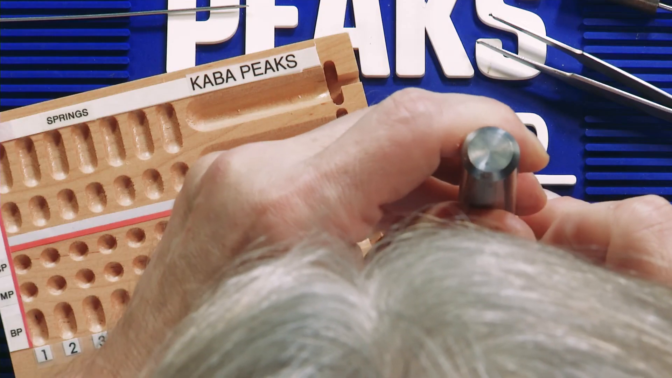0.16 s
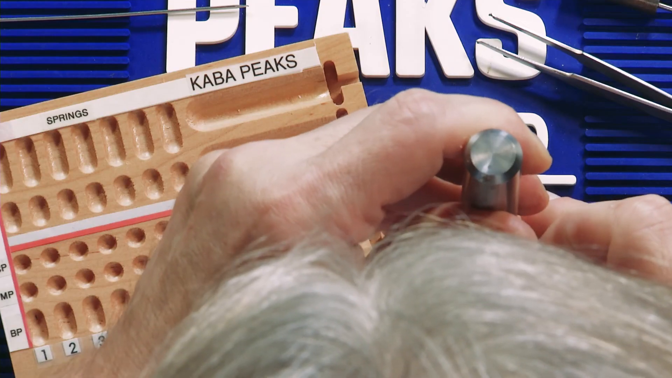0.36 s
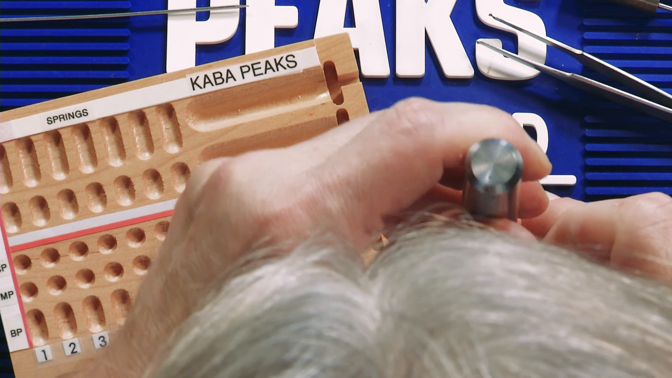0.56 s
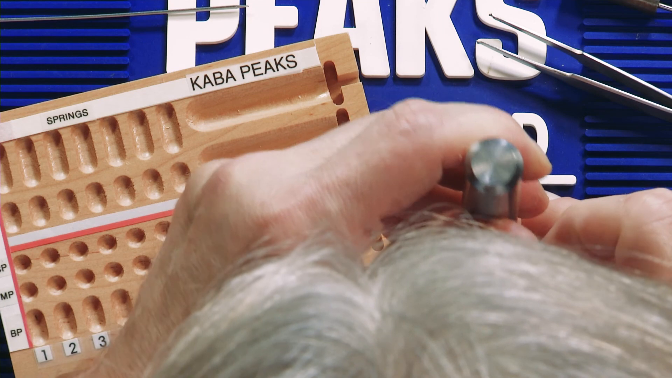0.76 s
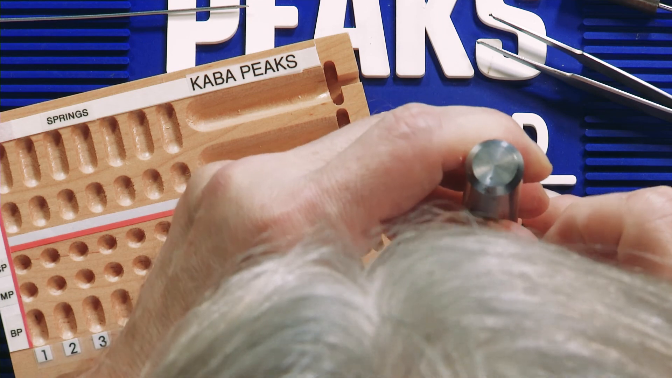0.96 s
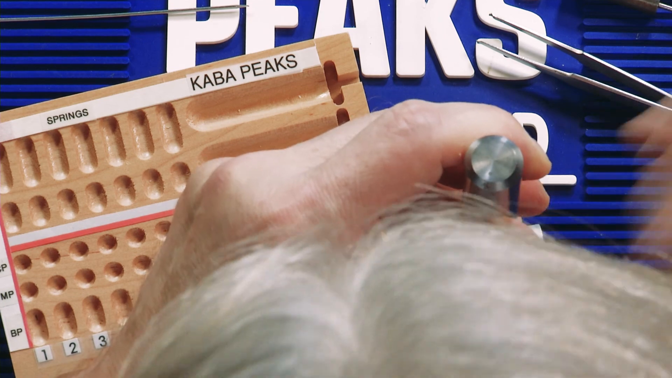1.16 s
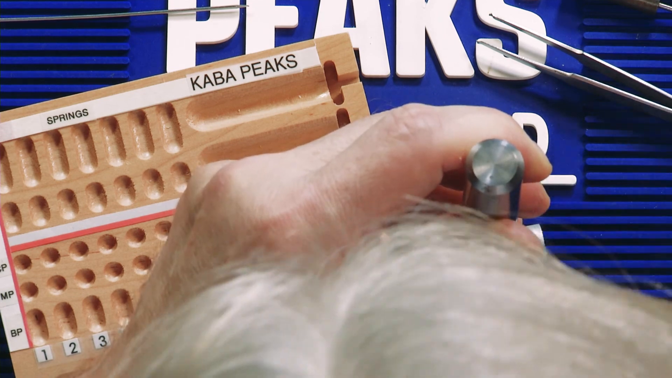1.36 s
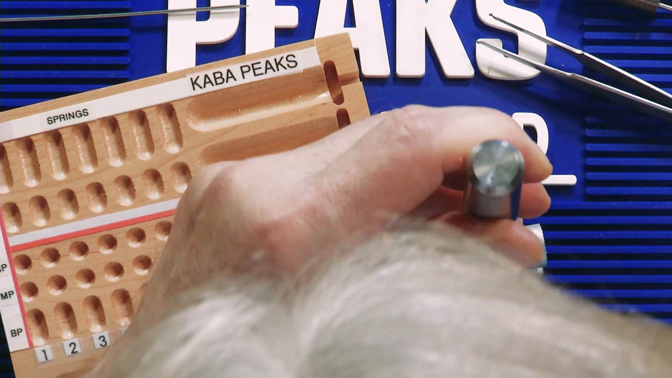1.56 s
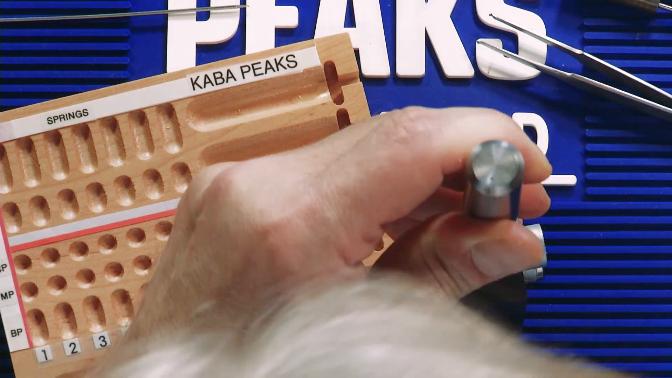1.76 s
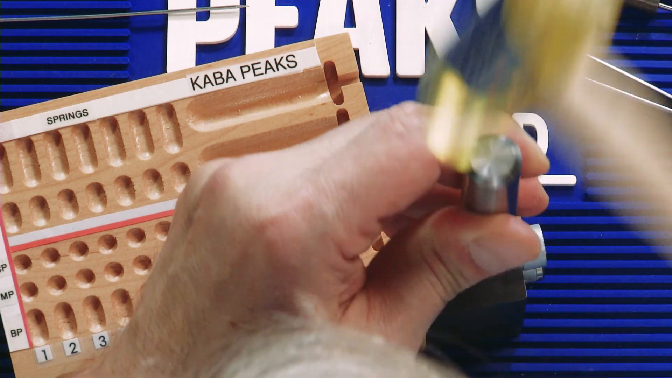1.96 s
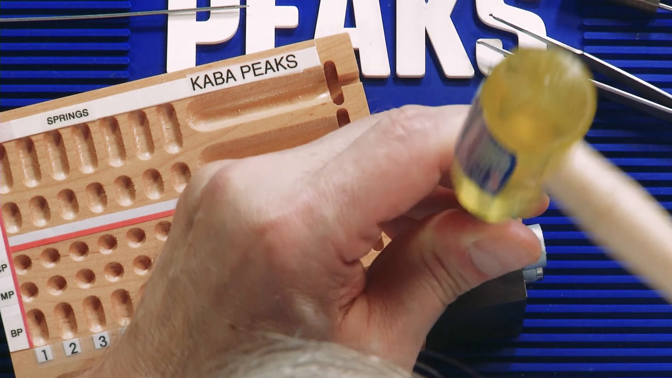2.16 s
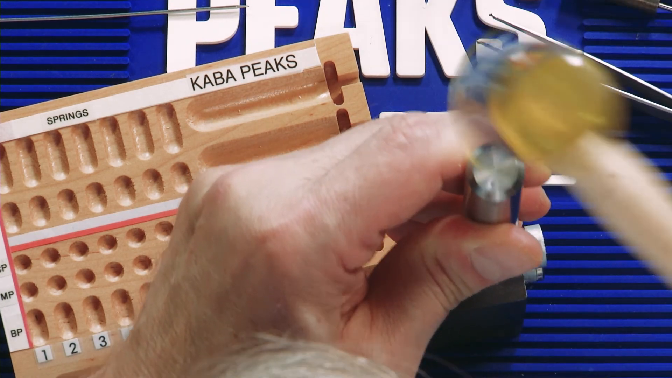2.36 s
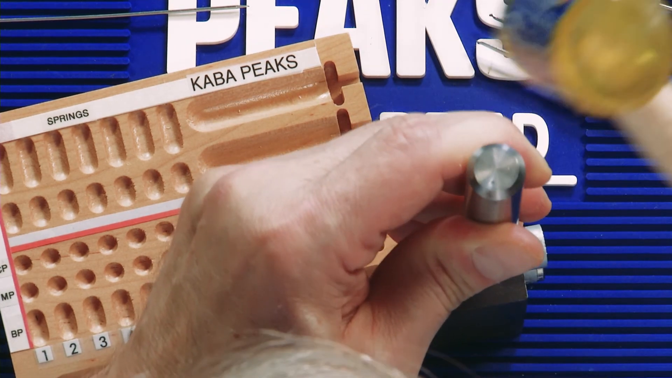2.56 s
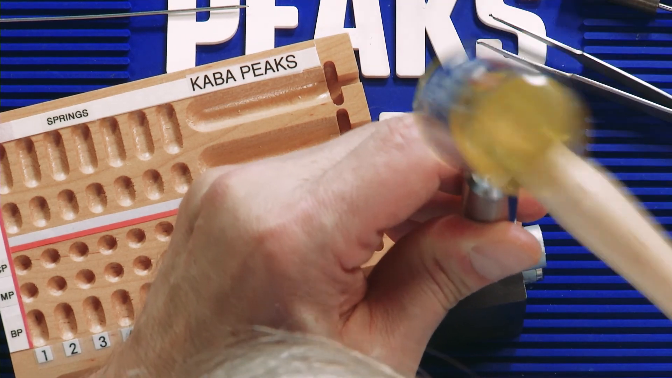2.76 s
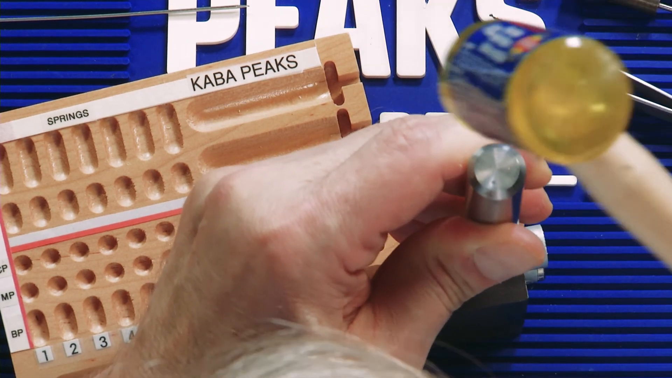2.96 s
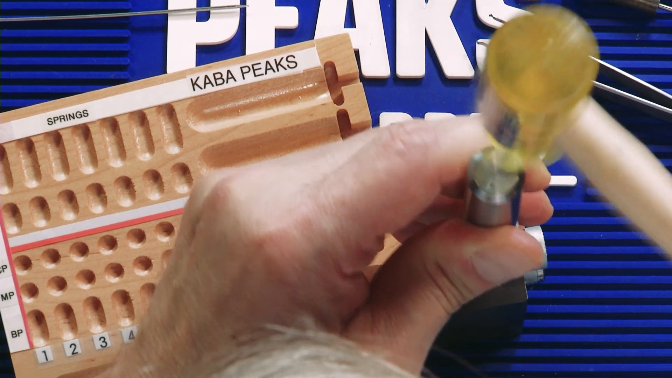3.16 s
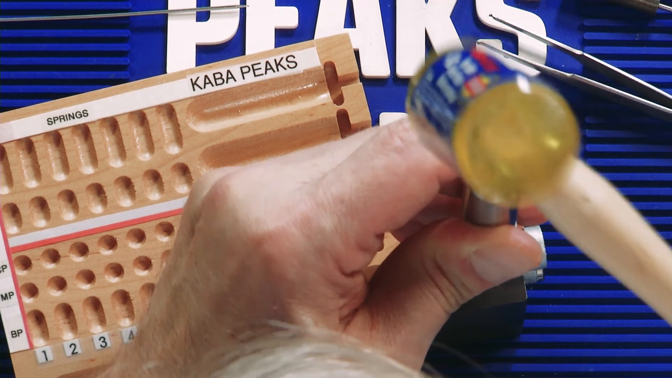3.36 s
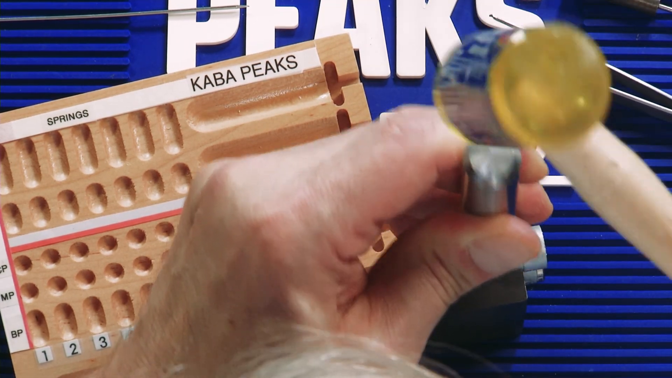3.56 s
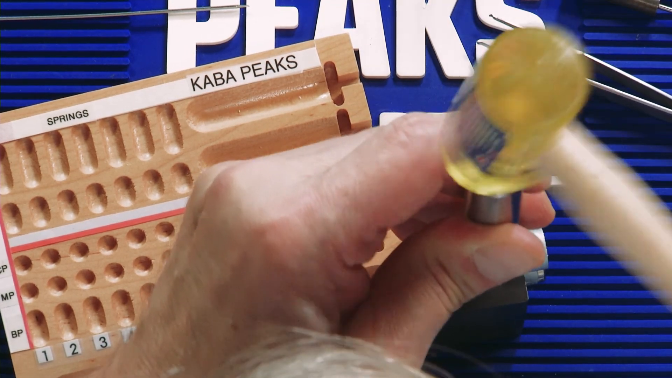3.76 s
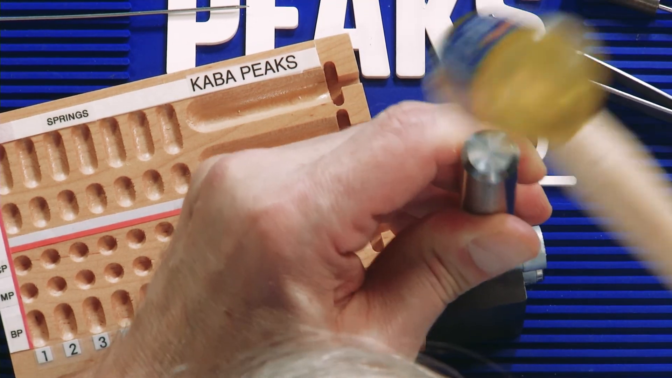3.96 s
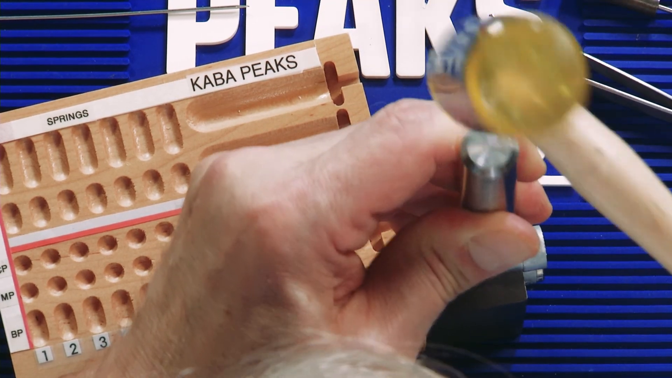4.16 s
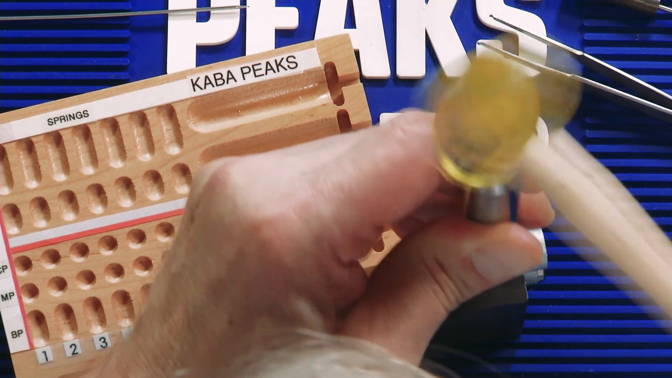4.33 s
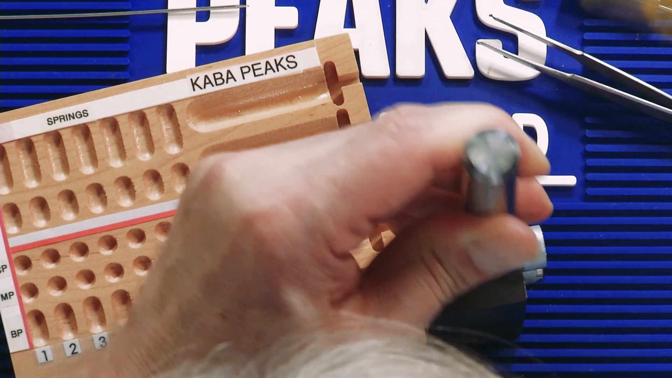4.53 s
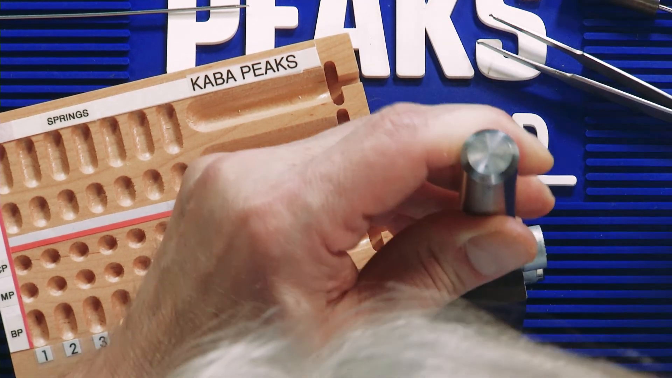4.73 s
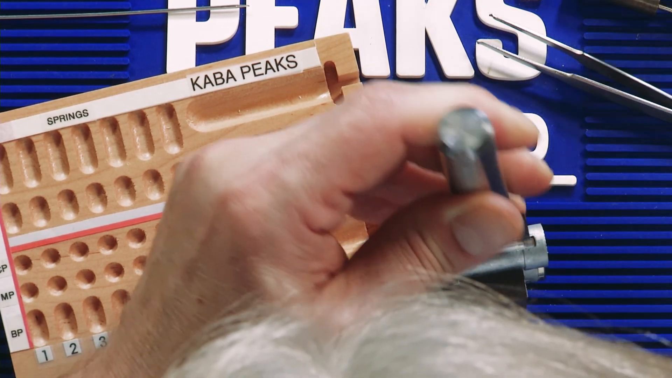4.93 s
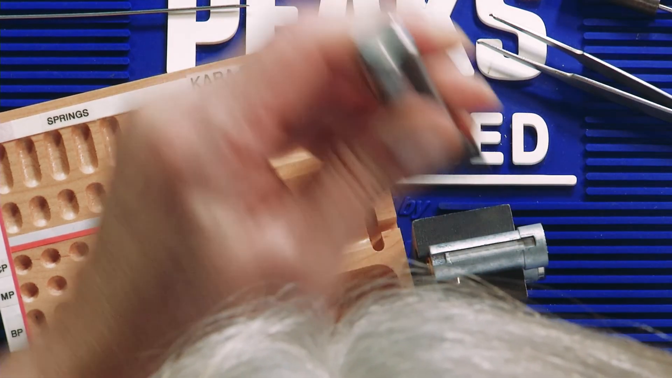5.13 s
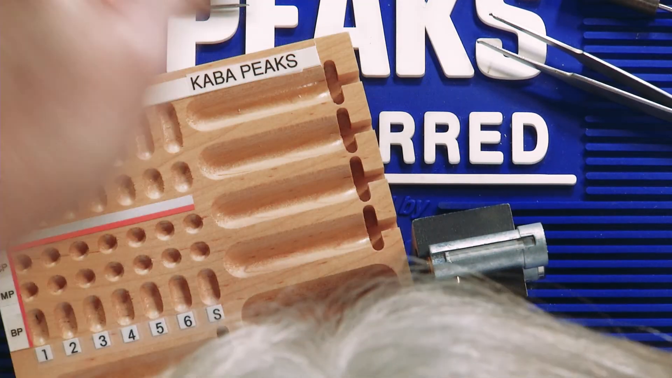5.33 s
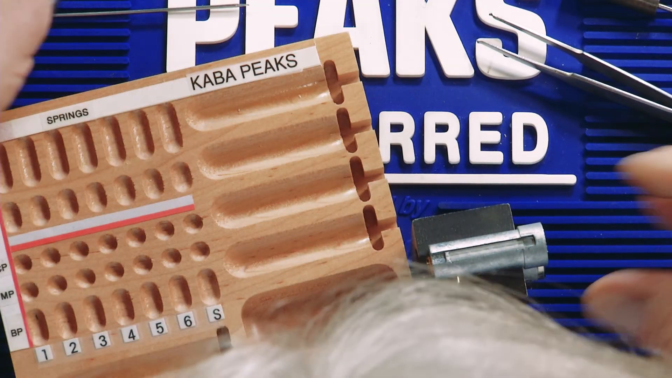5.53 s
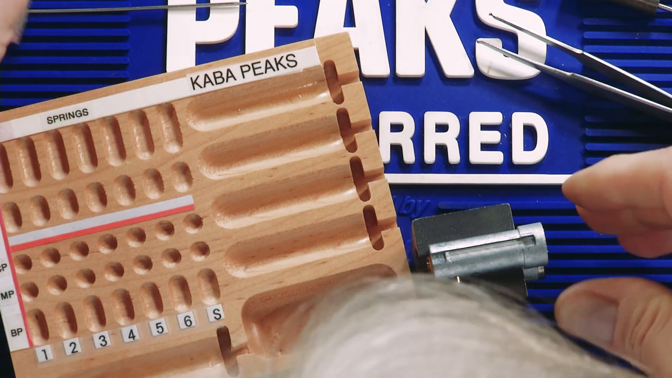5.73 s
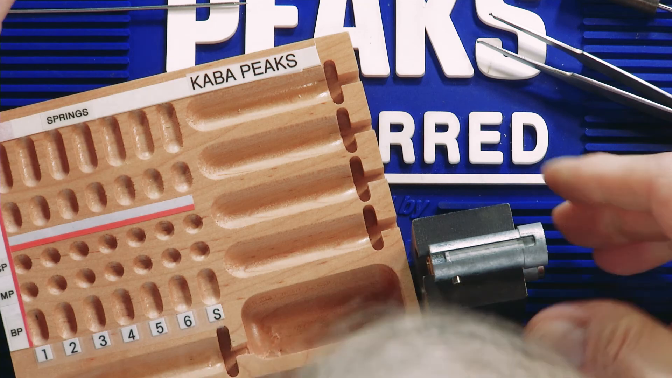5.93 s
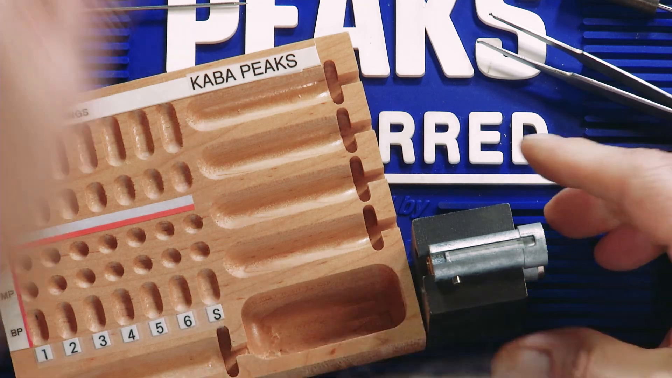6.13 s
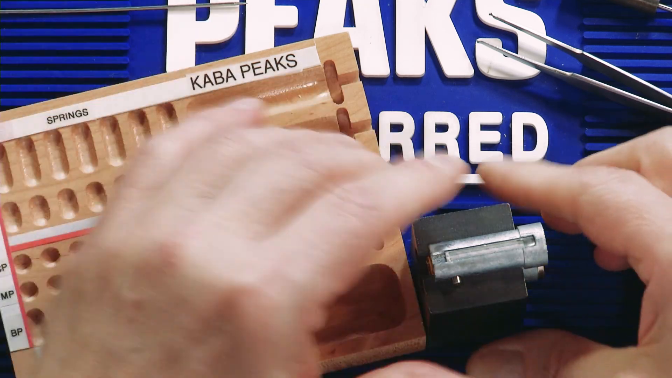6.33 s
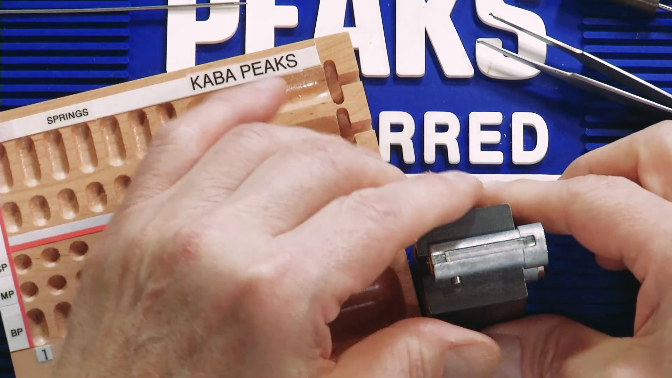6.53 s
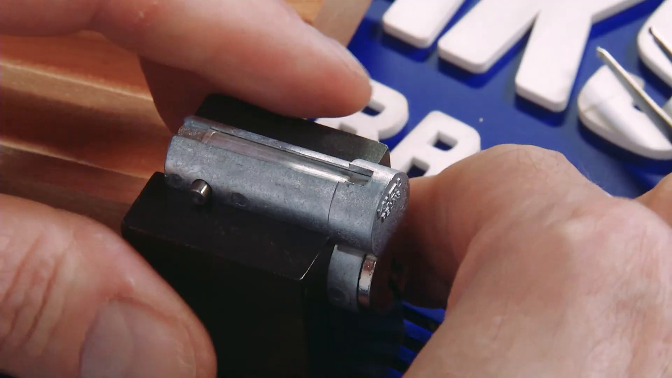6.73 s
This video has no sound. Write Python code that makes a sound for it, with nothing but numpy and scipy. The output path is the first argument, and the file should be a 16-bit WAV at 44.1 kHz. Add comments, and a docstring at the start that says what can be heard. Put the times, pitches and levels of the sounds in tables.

```python
"""A small plastic-faced mallet taps a cover into a metal lock core, close to a single microphone.
The core stands in a holder on a workbench, in a small quiet room with a faint fan. Seven taps,
growing firmer, click in the metal, thump the bench and overload the microphone. Then the mallet is
laid down, a steel piece rocks to rest in a wooden tray and the holder is knocked into place."""
import sys
import numpy as np
from scipy import signal
from scipy.fft import rfft, irfft
from scipy.io import wavfile

SR = 44100
rng = np.random.default_rng(int(sys.argv[2]) if len(sys.argv) > 2 else 0)


def materialize(psi):
    """Save the field psi as 16-bit PCM at rate SR to the path in sys.argv[1].

    A 1-D psi becomes a single channel; in a 2-D psi each row is a channel.
    """
    bounded = np.clip(np.atleast_2d(psi).T, -1, 1)
    quanta = np.round(bounded * 32767).astype(np.int16)
    wavfile.write(sys.argv[1], SR, quanta)


N = 303893

# fingers landing on the bench mat: (time [s], level [dB], pitch [Hz])
FINGER_LANDINGS = [(1.121, -50.5, 273), (6.603, -40.5, 144), (6.659, -37, 174.6)]
# mallet taps: (time [s], strength [dB], core ring [dB])
MALLET_TAPS = [(2.5364, -3.5, 7), (2.9376, -1.5, -6), (3.2496, -1, -4.5), (3.5592, 0.5, -9.5),
               (3.8754, 1, -7), (4.1759, 2, -4), (4.4750, 2.5, -0.5)]
# holder brushed as the core is lifted off, then nudged: (time [s], level [dB], contact cut-off [Hz])
HOLDER_CONTACTS = [(4.971, -45, 1500), (5.062, -41, 1500), (5.678, -38, 1500), (5.717, -34.5, 1500),
                   (5.881, -22.5, 365), (5.979, -34, 1090), (6.015, -15, 354), (6.02, -29.5, 1560),
                   (6.0350, -2.5, 1794)]
# steel piece rocking to rest in the tray: (time [s], level [dB])
STEEL_CONTACTS = [(5.3436, 0), (5.3520, -19), (5.3785, -18), (5.3820, -11.5), (5.3855, -21),
                  (5.3965, -20.5)]


def from_db(db):
    """Decibels to gain."""
    return 10 ** (np.asarray(db) / 20)


def seconds(length):
    """A time axis."""
    return np.arange(int(length * SR)) / SR


def at_hz(points, hz):
    """Read a table on a log-frequency axis."""
    freq, value = np.transpose(points)
    return np.interp(np.log(np.maximum(hz, 1)), np.log(freq), value)


def add(out, s, sound):
    """Mix a sound in at time s."""
    start = round(s * SR)
    out[start:start + len(sound)] += sound[:len(out) - start]


def soften(x, hz, order):
    """A longer contact leaves out the treble."""
    return signal.sosfilt(signal.butter(order, min(hz, .45 * SR), fs=SR, output="sos"), x + 1e-18)


def bandpass(x, band):
    """Keep the sound between two frequencies."""
    return signal.sosfilt(signal.butter(2, band, "band", fs=SR, output="sos"), x)


def strike(modes, vary_db, length=0.55):
    """Damped modes of alternating sign, excited a little differently by every blow."""
    t, out = seconds(length), 0
    for k, (hz, db, t60) in enumerate(modes):
        strength = (-1) ** k * from_db(db + rng.normal(0, vary_db))
        out = out + strength * np.sin(2 * np.pi * hz * t) * np.exp(-np.log(1000) * t / t60)
    return out


def room_tone():
    """Steady room air with the faint tones of a fan."""
    # air spectrum: (frequency [Hz], relative density [dB])
    air_colour = [(25, -3), (120, -5.5), (200, -9), (480, -11), (700, -17.5), (1200, -21), (2200, -26),
                  (3000, -29.5), (6000, -31.5), (16000, -37)]
    # fan tones: (frequency [Hz], level [dB])
    fan_tones = [(118.4, -73), (775.2, -80), (925.9, -79), (1007, -83), (1157, -79.5), (1238, -81),
                 (1470, -85), (2239, -87.5)]
    t = np.arange(N) / SR
    fan = sum(np.sqrt(2) * from_db(db - 0.5) * np.sin(2 * np.pi * (hz * t + rng.random()))
              for hz, db in fan_tones)
    colour = from_db(at_hz(air_colour, np.fft.rfftfreq(N, 1 / SR)))
    air = irfft(rfft(rng.standard_normal(N)) * colour, N)
    return from_db(-61.5) * air / np.std(air) + fan


def touches(events, decay_s, spread):
    """Small dead contacts: a short burst in a broad resonance."""
    out, t = np.zeros(N), seconds(.1)
    for s, db, hz in events:
        band = [hz / (1 + spread), min(hz * (1 + spread), .45 * SR)]
        burst = bandpass(rng.standard_normal(len(t)) * np.exp(-t / decay_s), band)
        add(out, s, from_db(db) * burst / np.abs(burst).max())
    return out


def bench_sway(events):
    """The bench frame takes a moment to start ringing, and carries on between the blows."""
    # sway and long rings of the frame and the tools on it: (frequency [Hz], level [dB], t60 [s])
    frame_modes = [(32, -43, 0.42), (39.7, -21, 0.15), (77.5, -15.5, 0.06), (134.5, -39.5, 0.7),
                   (175.3, -37, .56), (267.2, -36, .55), (302, -34.5, 0.56), (351.6, -34.5, 0.59),
                   (381.7, -32, 0.18), (448, -36.5, 0.57), (715, -37.5, 0.12), (898, -36.5, 0.24)]
    # one loose tool singing along: (frequency [Hz], level [dB], t60 [s])
    tool_modes = [(632, -48.5, .75), (937, -51, 1.15)]
    out, swell = np.zeros(N), 1 - np.exp(-seconds(1) / .014)
    for s, db, *_ in events:
        add(out, s, from_db(db) * swell * strike(frame_modes + tool_modes, vary_db=0.34, length=1))
    return out


def metal_ticks():
    """Metal touches lightly, too briefly to ring."""
    # touches: (time [s], level [dB], pitch [Hz])
    ticks = [(2.2768, -39, 1705), (4.690, -54, 3190), (4.971, -50.5, 6000), (5.062, -54, 4500),
             (5.1775, -54, 6000), (6.0355, -41.5, 4500), (6.378, -51.5, 2200), (6.543, -56, 6610),
             (6.603, -44, 2800), (6.629, -52, 2190)]
    return touches(ticks, decay_s=0.0038, spread=0.69)


def mallet_taps():
    """Each blow clicks in the core and drives the bench; firmer ones lift the holder for longer."""
    # bench top under the holder: (frequency [Hz], level [dB], t60 [s])
    bench_modes = [(132.5, -7, .04), (256, 0.5, .02), (386, 0.5, 0.027), (514, -11, .035),
                   (681, -8.5, 0.034), (851, -4.5, .027), (1073, -8.5, .018), (1192, -13.5, .028),
                   (1383, -15, 0.036), (1705, -17.5, 0.021), (2040, -10.5, .01), (2480, -17, 0.013)]
    # lock core damped by the fingers: (frequency [Hz], level [dB], t60 [s])
    core_modes = [(4557, -21.5, .006), (4960, -15.5, 0.0093), (5200, -16.5, 0.0064), (6270, -21.5, .006),
                  (6900, -21, 0.0066)]
    plastic_contact_hz = 1330
    out = np.zeros(N)
    for s, db, ring_db in MALLET_TAPS:
        # the hand bears down differently each time, which shifts the modes a little
        loaded = [(hz * rng.normal(1, .014), mode_db, t60) for hz, mode_db, t60 in bench_modes]
        blow = from_db(db) * soften(strike(loaded, vary_db=0.74), plastic_contact_hz, order=2)
        add(blow, 0, crack(slip_s=0.00081, level_db=-25.5))  # the cover slips as loudly on every tap
        add(out, s, blow)
        flight_s, landing_db = .0135 * from_db(db), -18 + 1.8 * db  # the holder rebounds
        add(out, s + flight_s, from_db(landing_db) * blow)
        add(out, s + .0004, from_db(ring_db) * strike(core_modes, vary_db=3.0))
        add(out, s, rattle(count=12, spread_s=0.044, level_db=-44))
    return out


def crack(slip_s, level_db):
    """Metal slips into its seat: a few milliseconds of pitchless grating."""
    # spectrum of the slip: (frequency [Hz], relative density [dB])
    slip_colour = [(800, 0), (2000, 1), (3300, -3.5), (5000, -1.5), (7500, 0), (9000, -7), (12000, -11.5),
                   (16000, -14.5)]
    t = seconds(0.015)
    grains = rng.standard_normal(len(t)) * (t / slip_s) * np.exp(-t / slip_s)
    colour = from_db(at_hz(slip_colour, np.fft.rfftfreq(len(t), 1 / SR)))
    phase = np.angle(rfft(grains))  # the grains set the timing only, so the spectrum stays smooth
    burst = irfft(colour * np.exp(1j * phase), len(t)) * (1 - t / t[-1])
    return from_db(level_db) * burst / np.std(burst)


def rattle(count, spread_s, level_db):
    """Loose pins and the holder chatter after a blow, fading as they settle."""
    out = np.zeros(int(.2 * SR))
    delays = .006 + spread_s * rng.random(count)
    for delay, size in zip(delays, rng.uniform(.3, 1, count)):
        fade = np.exp(-2 * delay / spread_s)
        add(out, delay, size * fade * crack(slip_s=.0004, level_db=level_db))
    return out


def knocks(events, modes):
    """An object is knocked into ringing, each contact with its own hardness."""
    out = np.zeros(N)
    for s, db, contact_hz in events:
        add(out, s, from_db(db) * soften(strike(modes, vary_db=2.38), contact_hz, order=5))
    return out


def holder_knocks():
    """The holder is brushed, then knocks on the bench as it is nudged into place."""
    # the holder: (frequency [Hz], level [dB], t60 [s])
    holder_modes = [(142.7, -24.5, 0.023), (284, -11.5, 0.014), (497, -21.5, 0.083), (525, -19.5, 0.046),
                    (747, -8.5, 0.023), (926, -12.5, 0.029), (1080, -19.5, 0.04), (1137, -21, 0.063),
                    (1343, -13.5, 0.014), (1653, -23.5, 0.042), (2130, -8.5, 0.0083)]
    return knocks(HOLDER_CONTACTS, holder_modes)


def mallet_down():
    """The mallet is laid on the bench and rings briefly."""
    # head, then handle: (time [s], level [dB], contact cut-off [Hz])
    contacts = [(5.1768, -2.5, 2400), (5.1895, -2.5, 1097)]
    # the mallet: (frequency [Hz], level [dB], t60 [s])
    mallet_modes = [(174.2, -25.5, 0.049), (293, -18.5, 0.05), (452, -15, 0.03), (673, -11, 0.023),
                    (852, -4.5, 0.016), (1028, -7.5, 0.01), (1178, -27, 0.049), (1300, -17, 0.03),
                    (1558, -10, 0.013), (1830, -12, 0.021), (2133, -10.5, 0.016)]
    return knocks(contacts, mallet_modes)


def steel_down():
    """Steel and tray ring together with a small crack; firmer contacts are shorter and brighter."""
    # the wooden tray: (frequency [Hz], level [dB], t60 [s])
    tray_modes = [(166, -26.5, 0.072), (291, -20.5, 0.083), (462, -10.5, 0.054), (590, -18, 0.034),
                  (704, -14.5, 0.04), (872, -16, 0.081), (1068, -23.5, 0.038), (1398, -20, 0.032),
                  (1616, -26.5, 0.03), (2135, -16, 0.017), (2750, -24, 0.026), (3560, -23, 0.0079),
                  (4460, -18, 0.011), (7310, -28, 0.019)]
    # the steel piece: (frequency [Hz], level [dB], t60 [s])
    steel_modes = [(2632, -43, 0.14), (4630, -41.5, 0.13), (4840, -48, 0.34), (5227, -42, 0.18),
                   (6050, -71.5, 0.16), (8100, -45, 0.2)]
    contact_hz, hardening = 7970, 0.18  # cut-off at 0 dB; it rises with this power of the strength
    contacts = [(s, db, contact_hz * from_db(hardening * db)) for s, db in STEEL_CONTACTS]
    out = knocks(contacts, tray_modes) + knocks(contacts, steel_modes)
    for s, db in STEEL_CONTACTS:
        add(out, s, from_db(db) * crack(slip_s=0.00085, level_db=-50))
    return out


def small_room(x, tail_db, build_s):
    """Two near reflections reach the microphone, with a diffuse tail whose treble dies first."""
    # tail colour: (frequency [Hz], relative level [dB])
    tail_colour = [(60, -9), (160, -3.5), (370, -6), (560, -0.5), (850, -6.5), (1500, 2.5), (3000, 1),
                   (6000, -2), (14000, -3.5)]
    # tail decay: (frequency [Hz], t60 [s])
    tail_t60 = [(60, 0.18), (300, 0.4), (1000, .3), (2500, 0.24), (5000, 0.215), (9000, 0.1), (15000, 0.17)]
    # near surfaces: (delay [s], level [dB])
    reflections = [(.0098, -23.5), (0.025, -26)]
    t, edges = seconds(.6), np.geomspace(45, 17000, num=14)
    white, response = rng.standard_normal((2, len(t))), np.zeros(len(t))
    for k, band in enumerate(zip(edges, edges[1:])):
        hz = np.sqrt(band[0] * band[1])
        decay = np.exp(-np.log(1000) * t / at_hz(tail_t60, hz))
        response += bandpass(white[k % 2], band) * from_db(tail_db + at_hz(tail_colour, hz)) * decay
    response *= 1 - np.exp(-(t / build_s) ** 2)
    for delay, db in reflections:
        add(response, delay, from_db([db]))
    return signal.fftconvolve(x, response)[:N]


def scene():
    """Taps, then tidying up, heard in mono from close to the bench with some room behind."""
    taps = mallet_taps()
    mallet = mallet_down()
    steel = steel_down()
    handling = holder_knocks() + metal_ticks() + touches(FINGER_LANDINGS, decay_s=0.0053, spread=0.41)
    sway = bench_sway(MALLET_TAPS)
    # light, hard objects sway the bench less readily than soft, heavy fingers
    sway += from_db(-13) * bench_sway(STEEL_CONTACTS + HOLDER_CONTACTS)
    sway += from_db(1.0) * bench_sway(FINGER_LANDINGS)
    into_room = taps + from_db(-7.5) * mallet + from_db(-5) * steel + from_db(-2.5) * handling
    reverb = small_room(into_room, tail_db=-37.0, build_s=0.0015)
    return (taps + sway + mallet + steel + handling + reverb + room_tone())[None]


def record(dry):
    """The close microphone's input clips flat on the blows; the highest treble is cut."""
    ceiling, cutoff_hz = .51, 16300
    top_cut = signal.cheby1(12, .1, cutoff_hz, fs=SR, output="sos")
    return signal.sosfilt(top_cut, np.clip(dry, -ceiling, ceiling))


dry = scene()
out = record(dry)
materialize(out)
```